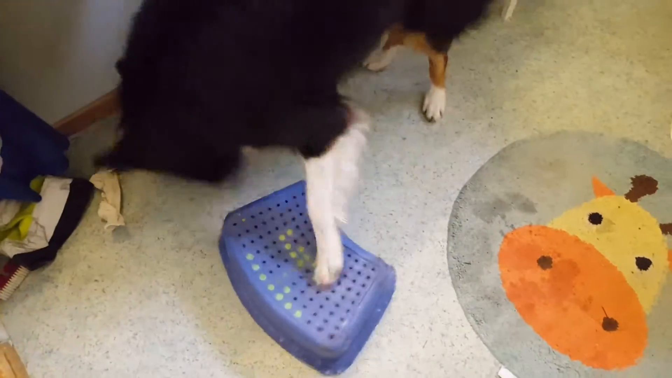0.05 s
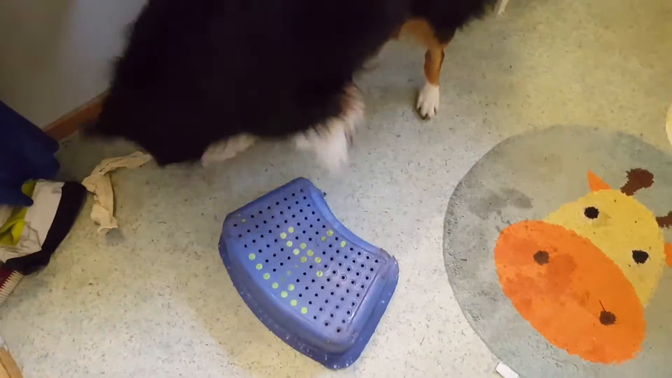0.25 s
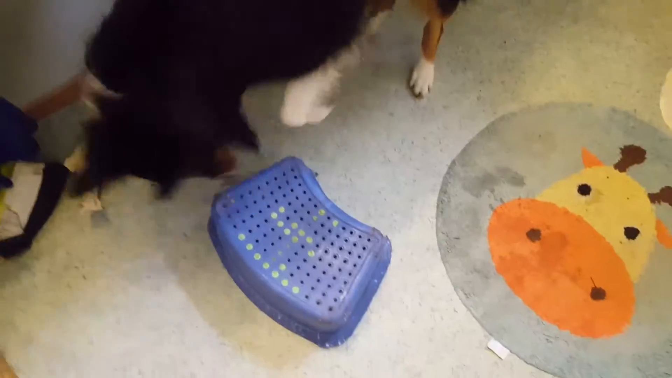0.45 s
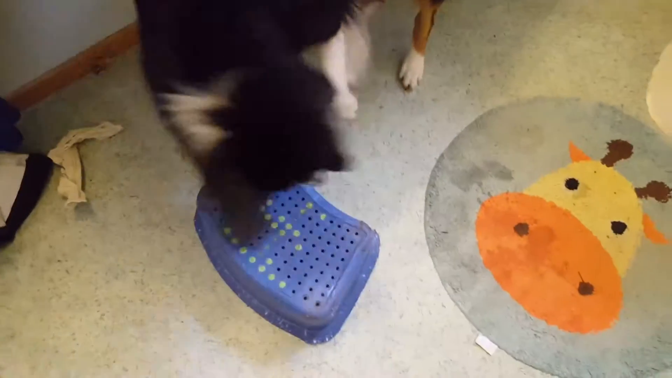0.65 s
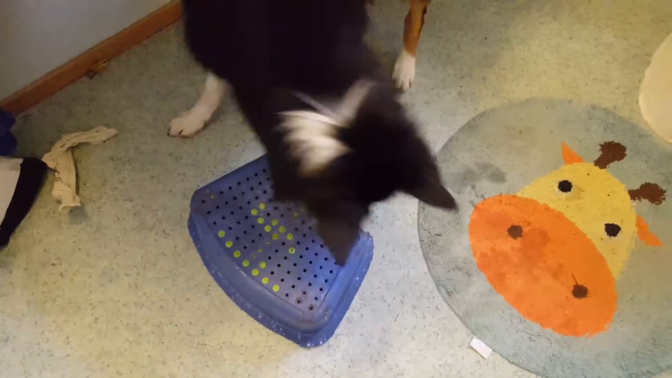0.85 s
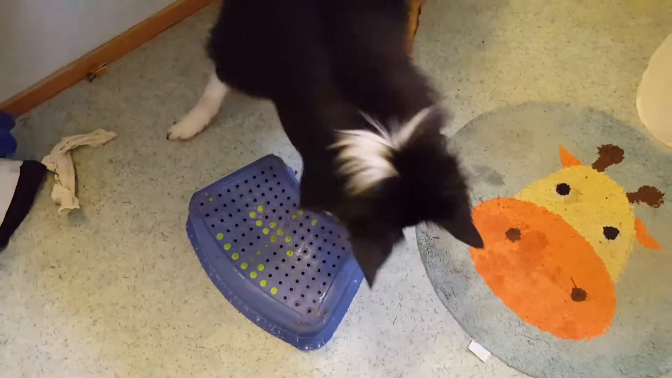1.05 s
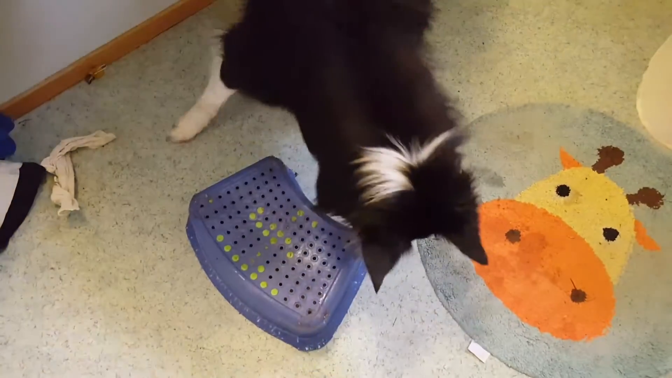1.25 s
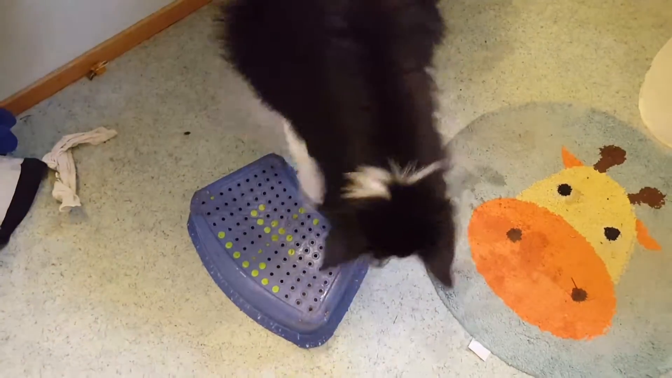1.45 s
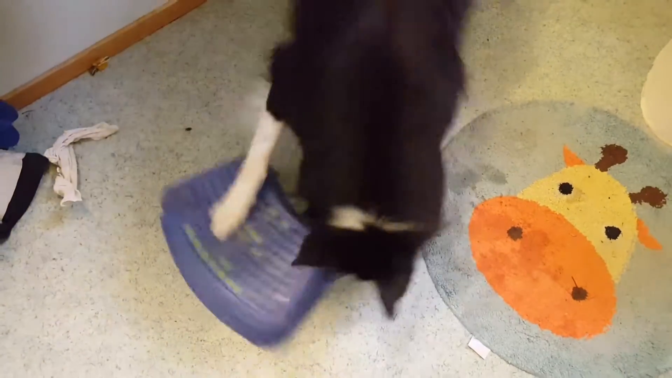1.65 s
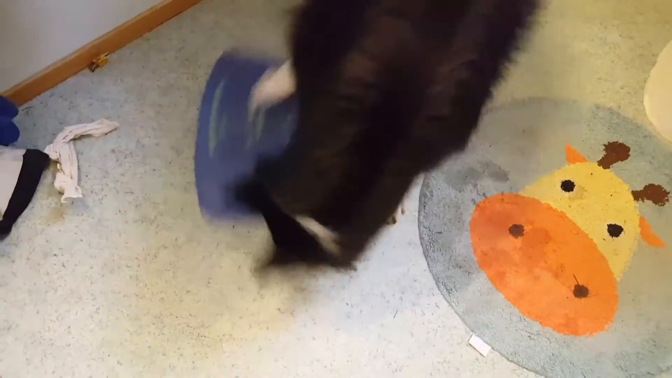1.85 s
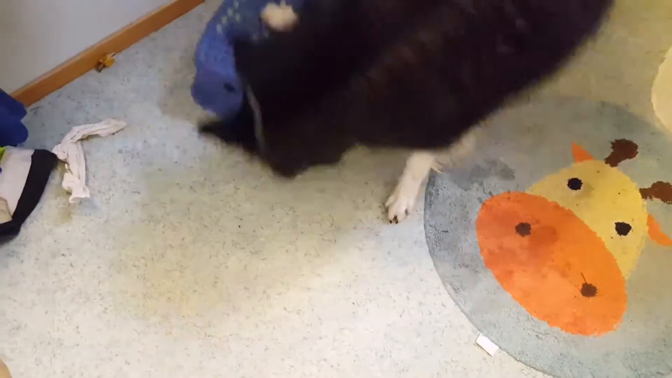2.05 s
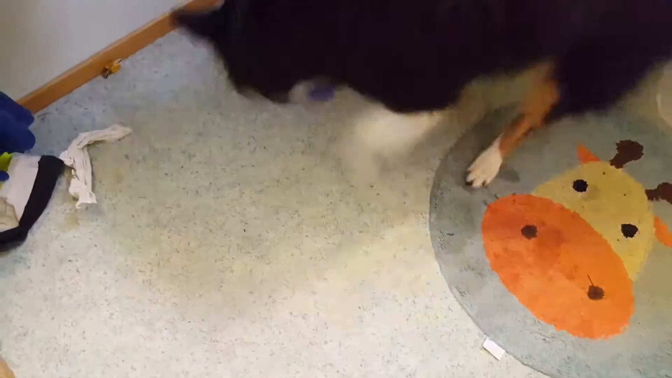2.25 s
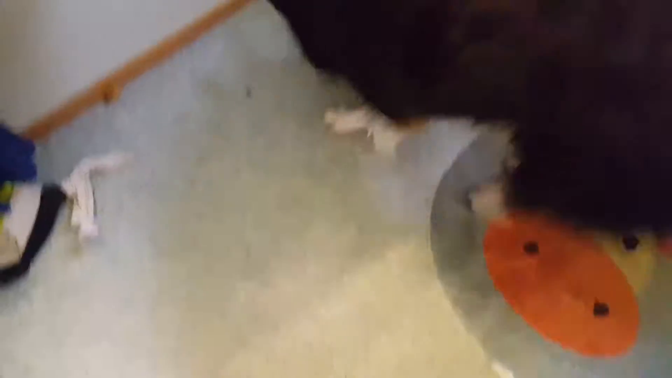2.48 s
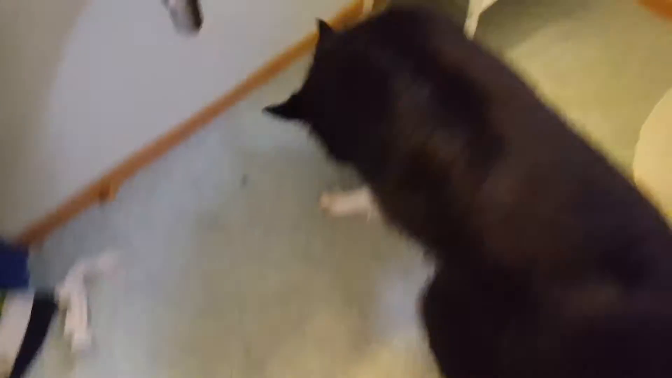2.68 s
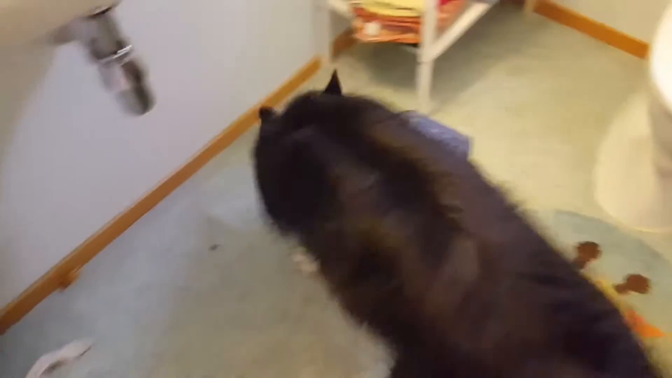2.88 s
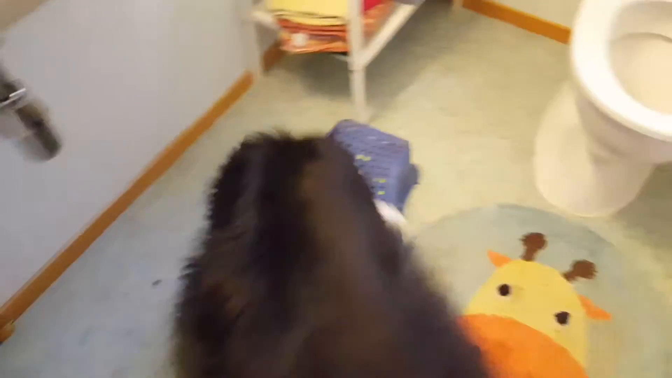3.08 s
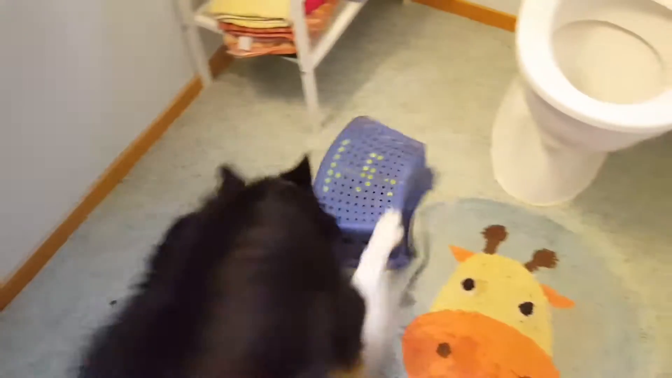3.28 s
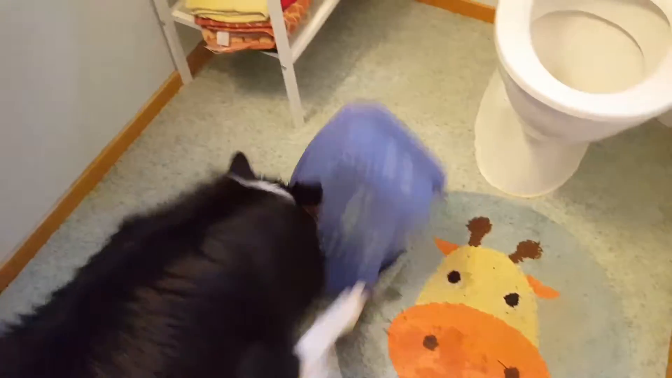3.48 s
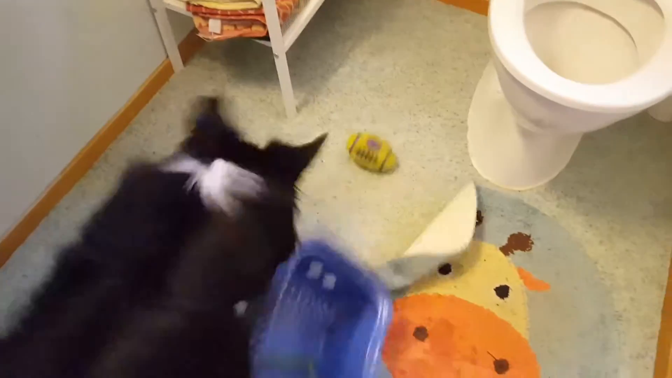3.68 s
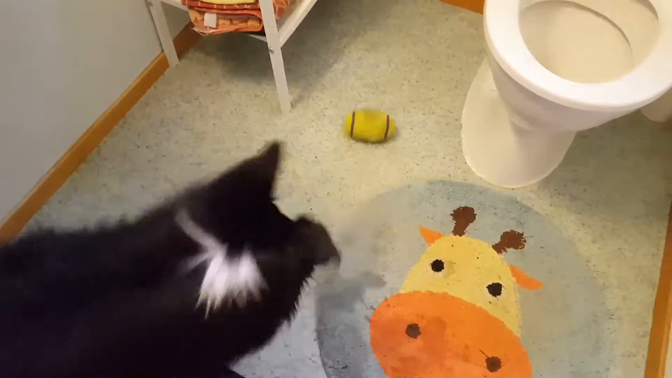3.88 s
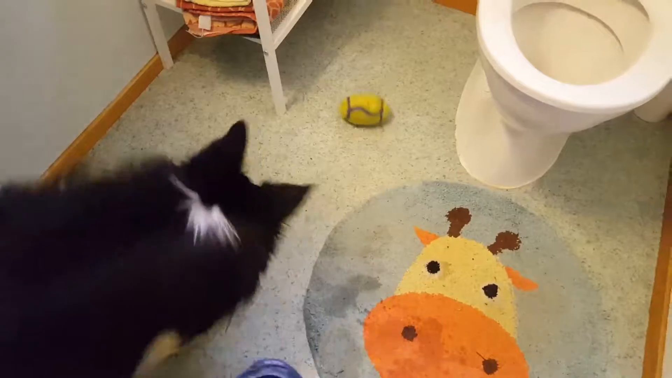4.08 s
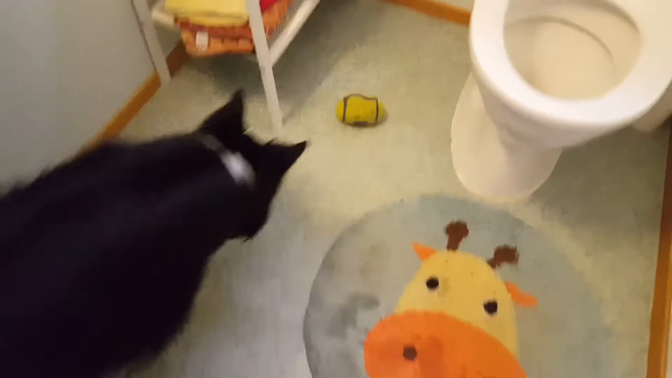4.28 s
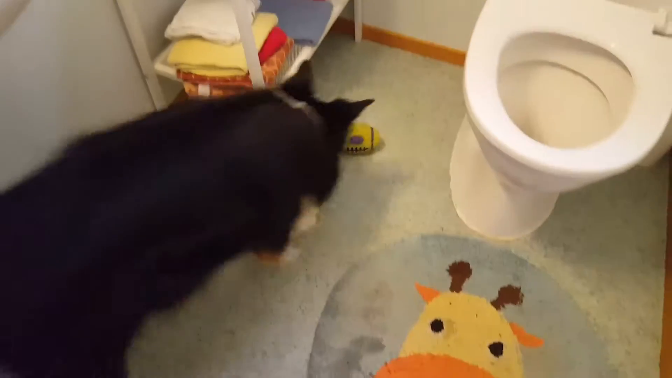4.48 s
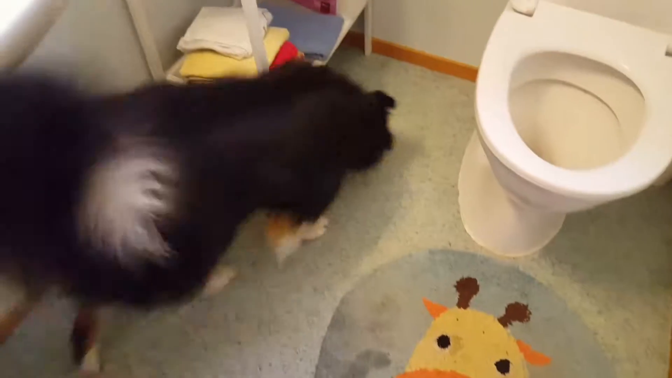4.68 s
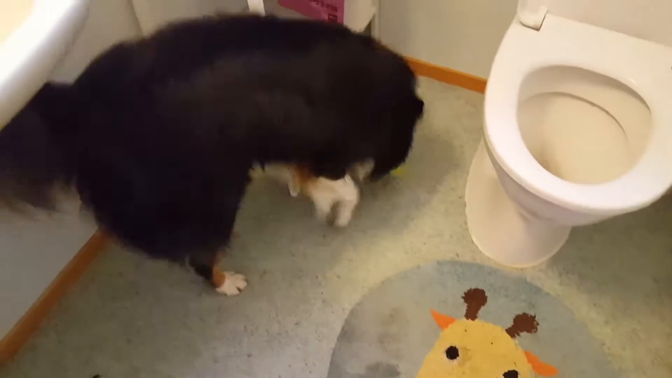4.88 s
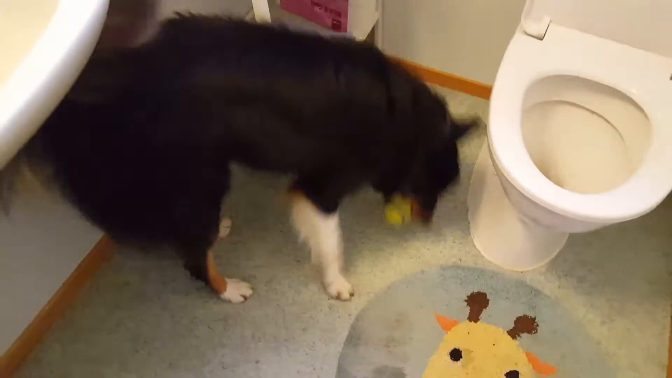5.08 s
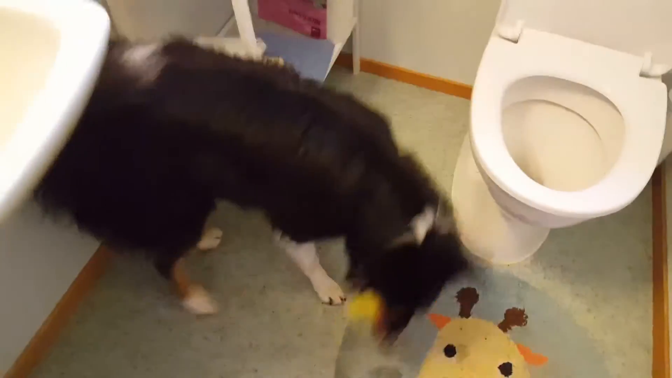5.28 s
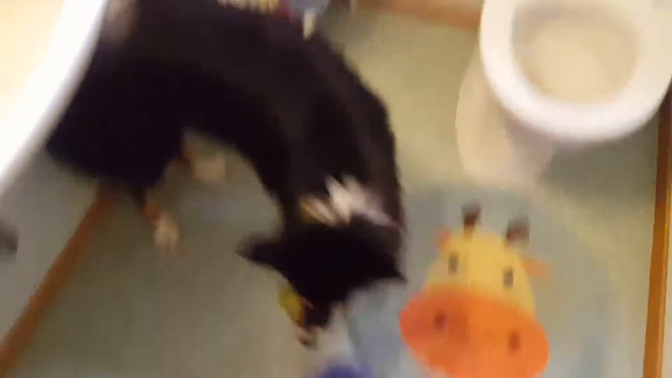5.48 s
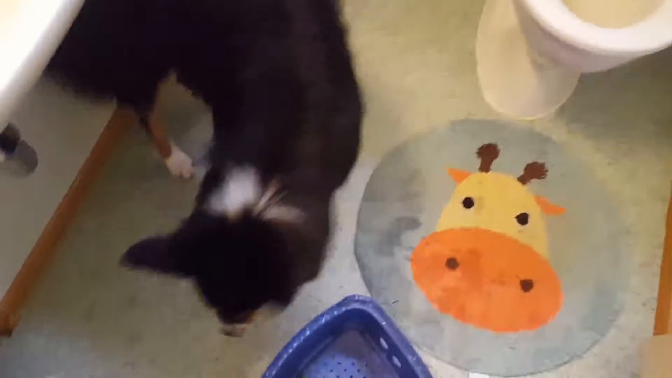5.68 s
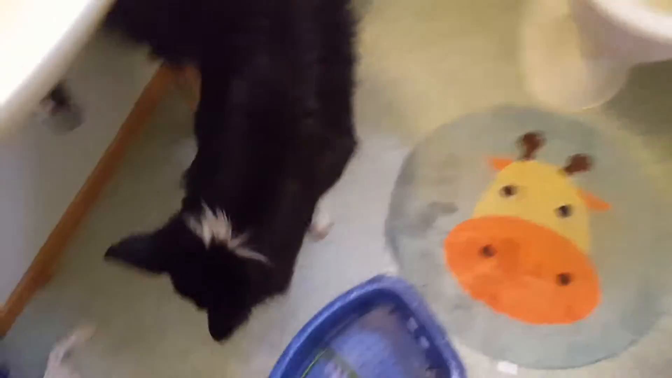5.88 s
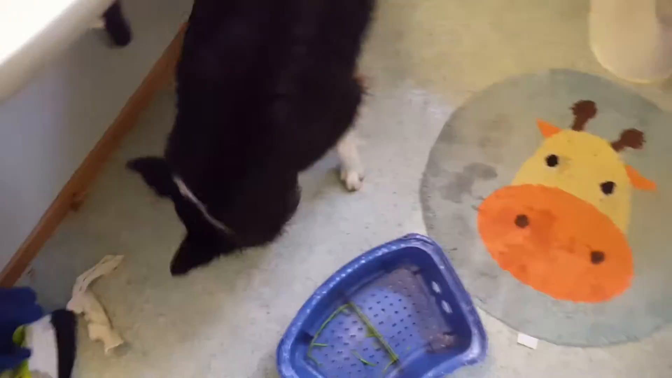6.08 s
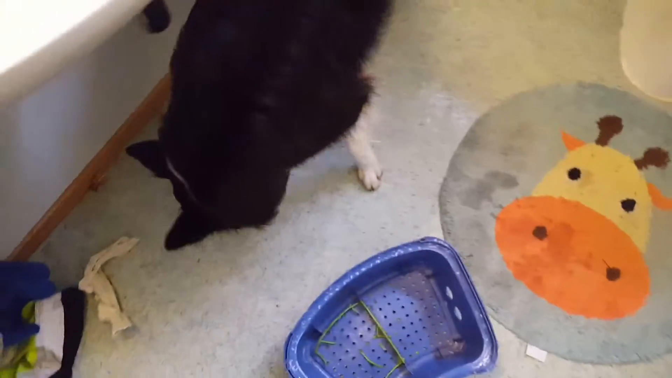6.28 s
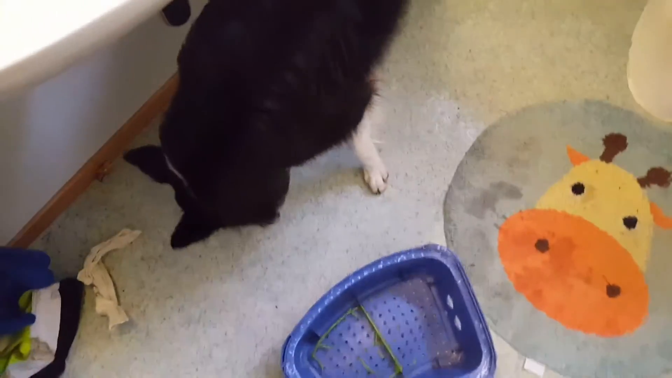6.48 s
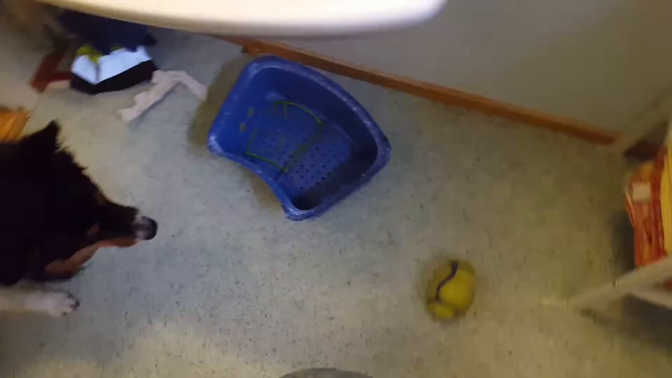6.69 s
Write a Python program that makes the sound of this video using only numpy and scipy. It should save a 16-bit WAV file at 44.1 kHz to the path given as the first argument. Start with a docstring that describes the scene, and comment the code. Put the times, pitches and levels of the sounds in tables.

```python
"""Dog and plastic stool in a bathroom

A dog shoves a hollow plastic step stool over a hard floor in a small, booming stereo room with quiet air.
Uneven slips drive the sliding feet and rim; nearly even stick-slip makes them groan or squeak.
Blows ring the shell and the walls as the stool flips and tumbles to rest; some sound one clear mode.
Tiny scuffs make a brushing rustle, of the sliding stool at first and then of the dog,
whose paws and claws touch the floor as softer blows."""
import sys
import numpy as np
from scipy import signal
from scipy.fft import rfft, irfft, next_fast_len
from scipy.io import wavfile

SR = 44100
rng = np.random.default_rng(int(sys.argv[2]) if len(sys.argv) > 2 else 0)


def inscribe(sig):
    """Save sig as 16-bit PCM at rate SR to the path in sys.argv[1].

    A 1-D sig is mono; a 2-D sig holds one channel per row.
    Samples are clipped to [-1, 1] before scaling.
    """
    pcm = np.round(np.clip(np.atleast_2d(sig).T, -1, 1) * 32767)
    wavfile.write(sys.argv[1], SR, pcm.astype(np.int16))


N = 297220
SIZE = 24576  # samples in one ring-out
T = np.arange(SIZE) / SR
HZ = np.fft.rfftfreq(SIZE, 1 / SR)


def amp(db):
    """Decibels to gain."""
    return 10 ** (np.asarray(db) / 20)


def unit(x):
    """x at rms 1."""
    return x / np.sqrt(np.mean(x ** 2) + 1e-20)


def along(points, hz):
    """Read (frequency [Hz], value) points on a log frequency axis."""
    f, v = np.transpose(points)
    return np.interp(np.log(hz + 1), np.log(f + 1), v)


def add(out, s, x):
    """Mix x into out from time s [s]."""
    part = out[:, max(round(s * SR), 0):][:, :x.shape[1]]
    part += x[:, :part.shape[1]]


def coloured(x, gain):
    """Pass a ring-out through the causal minimum-phase filter of that gain, by way of the cepstrum."""
    fold = np.r_[1, np.full(SIZE // 2 - 1, 2), 1, np.zeros(SIZE // 2 - 1)]
    cepstrum = irfft(np.log(np.maximum(gain, 1e-6))) * fold
    return irfft(rfft(x) * np.exp(rfft(cepstrum)))


# likeness of the two microphones: (frequency [Hz], left-right correlation [-])
LIKENESS = [(60, 1), (140, 0.93), (260, 0.86), (500, 0.72), (1000, 0), (12000, 0.046)]


def diffuse(size, spectrum=None):
    """Stereo noise from all sides: the bass is alike at both microphones, the treble is not."""
    hz = np.fft.rfftfreq(size, 1 / SR)
    turn = np.arccos(np.clip(along(LIKENESS, hz), 0, .995)) / 2
    gain = 1 if spectrum is None else amp(along(spectrum, hz))
    noise = rfft(rng.standard_normal((2, size)))
    mid, side = irfft(noise * gain * [np.cos(turn), np.sin(turn)], size)
    return unit(np.array([mid + side, mid - side]))


# shell and room modes that ring together: (frequency [Hz], relative energy [dB], t60 [s])
RINGING_MODES = [(89, -24, 0.19), (143.1, -23.5, 0.35), (233.9, -23, 0.23), (311.6, -35.5, 0.25),
                 (357.5, -27, 0.33), (487, -25.5, 0.49), (669, -29, 0.08), (766.7, -27, 0.25),
                 (1196, -32.5, .18), (1464, -27.5, 0.1), (1894, -29, 0.1), (2145, -28, 0.13),
                 (3030, -33, .08)]
# decay of the bathroom: (frequency [Hz], t60 [s])
ROOM_DECAY = [(80, 0.3), (250, 0.34), (700, 0.29), (2000, 0.27), (6000, 0.25), (14000, 0.28)]


def ring_out(crack_db, modes_db, crack_t60=0.019, wall_delay=0.0038):
    """The answer to one push at a new spot: a short direct crack, ringing modes and the walls' tail."""
    hz, t, z = signal.stft(diffuse(SIZE), SR, nperseg=256)
    decay = amp(-60 * t / along(ROOM_DECAY, hz)[:, None])
    tail = signal.istft(z * decay, SR, nperseg=256)[1][:, :SIZE]
    tail = tail * (1 - np.exp(-T / wall_delay))  # reflections build up within a few metres
    crack = diffuse(SIZE) * amp(-60 * T / crack_t60)  # plastic is heavily damped
    answer = tail / np.linalg.norm(tail[0]) + amp(crack_db) * crack / np.linalg.norm(crack[0])
    for mode_hz, db, t60 in RINGING_MODES:
        mode = np.cos(2 * np.pi * mode_hz * T) * amp(-60 * T / t60)
        spread_db = rng.normal(0, 4.02)  # each spot excites each mode differently
        answer += amp(modes_db + db + spread_db) * mode / np.linalg.norm(mode)
    return answer


def spot(depth_db, count=56):
    """Every point of contact favours its own set of broad resonances."""
    pitches = np.geomspace(300, 15000, num=count)
    strengths = depth_db * rng.standard_normal(size=count) * (pitches > pitches[0])
    return amp(along(np.c_[pitches, strengths], HZ))


def slips(t, rate, spread, clump_db):
    """Tiny catches and releases of uneven strength, rate a second on average, that come in clumps."""
    count = len(t)
    passed = np.floor(np.cumsum(rng.exponential(size=count) * rate / SR))
    catches = np.diff(passed, prepend=0)
    knots = np.linspace(t[0], t[-1], num=12)
    clumps = amp(clump_db * np.interp(t, knots, rng.standard_normal(len(knots))))
    sizes = rng.choice([-1, 1], count) * np.exp(spread * rng.standard_normal(count))
    shift = rng.uniform(-.5, .5, count) * SR / rate  # up to half a mean gap either way
    scatter = np.clip(np.arange(count) + shift, 0, count - 1).astype(int)
    return unit(np.bincount(scatter, catches * sizes, count) * clumps)


# edges of the zones thump, body, knock, clack and tick: (frequency [Hz])
ZONE_EDGES = [60, 200, 700, 2000, 6000, 15000]


def zone_levels(x, window):
    """Level of each zone [dB] over the first window seconds, both microphones averaged."""
    start = x.mean(0)[:round(window * SR)]
    power = 2 * np.abs(rfft(start, SIZE)) ** 2 / (SIZE * len(start))
    return 10 * np.log10(np.histogram(HZ, ZONE_EDGES, weights=power)[0] + 1e-20)


def blows(rows, spectrum, balance_db, crack_db, modes_db, spot_db, window, cutoff_hz, contact_s):
    """A harder contact tilts the ring towards the treble; the weight behind it sets the floor's thump."""
    out = np.zeros((2, N))
    centres = np.sqrt(np.multiply(ZONE_EDGES[1:], ZONE_EDGES[:-1]))
    octaves = np.log2(centres / centres[1])  # above the body zone
    radiated = 1 / np.sqrt(1 + (cutoff_hz / (HZ + 1)) ** 4)  # small things radiate little deep bass
    landing = 1 - np.exp(-T / contact_s)  # the contact takes a moment to close
    for s, db, hardness, thump_db in rows:
        levels = db + np.array(balance_db) + np.where(octaves < 0, thump_db, hardness * octaves)
        colour = radiated * amp(along(spectrum, HZ)) * spot(spot_db)
        hit = coloured(landing * ring_out(crack_db, modes_db), colour)
        for _ in range(2):  # bring each zone close to its level in two passes
            correction_db = levels - zone_levels(hit, window)
            hit = coloured(hit, amp(along(np.c_[centres, correction_db], HZ)))
        add(out, s, hit)
    return out


# colour of the quiet room's air: (frequency [Hz], relative density [dB per Hz])
AIR_COLOUR = [(25, -9), (45, -6), (70, -12.5), (97, -3), (125, -16.5), (300, -14.5), (430, -18.5),
              (540, -15), (700, -21.5), (1400, -21), (4000, -32.5), (16000, -40)]


def background(air_db=-62):
    """Still room air: steady coloured noise that reaches the microphones from all sides."""
    return amp(air_db) * diffuse(N, AIR_COLOUR)


# brushing rustle, of the sliding stool at first and then of the dog:
# (time [s], length [s], level [dB])
BRUSHES = [(2.68, 0.31, -34), (3.043, 0.86, -41), (4.1, 0.25, -52), (4.505, 0.57, -57.5),
           (4.868, 0.95, -53), (5.601, 0.73, -61.5), (6.506, 0.43, -69.5)]
# colour of the rustle: (frequency [Hz], relative density [dB per Hz])
RUSTLE_COLOUR = [(59, -52), (100, -9), (135, -3.5), (389, -9.5), (558, -9), (1130, -10.5), (1800, -14.5),
                 (4500, -22.5), (7500, -30.5), (12400, -27), (16000, -43.5)]


def rustle(swell=0.77):
    """Brushing contact makes tiny uneven scuffs that swell and fade with each row's movement."""
    out, t = np.zeros((2, N)), np.arange(N) / SR
    speed = np.zeros(N)
    for s, length, db in BRUSHES:
        progress = np.clip((t - s) / length, 0, 1)
        speed += amp(db) * np.abs(np.sin(np.pi * progress)) ** swell
    force = speed * slips(t, rate=380, spread=0.88, clump_db=8.5)
    answer = coloured(ring_out(crack_db=-8.5, modes_db=-2.0), amp(along(RUSTLE_COLOUR, HZ)))
    add(out, 0, signal.fftconvolve(force[None], answer / np.linalg.norm(answer[0]), axes=1))
    return out


# the dog's paws and claws touch the floor:
# (time [s], strength [dB], contact hardness [dB per octave], floor thump [dB])
PAW_FALLS = [(0.567, -52.5, -2.2, -14), (1.366, -78, -0.5, 21), (1.463, -56.5, -3, -11),
             (1.594, -53, -1.5, 11), (4.544, -52, -2, 10), (4.661, -49, -0.5, 4), (4.792, -48.5, -1.5, -1),
             (4.9, -50.5, -4.5, -30), (5.188, -41, -0.14, 1.5), (5.315, -46, -3, -11.5),
             (5.69, -46.5, -2, 6), (5.754, -53, 1, -16), (5.993, -63.5, 1, 21), (6.204, -67, 1.5, -5),
             (6.611, -58.5, 2, 30.5), (6.674, -66.5, 4.5, 2)]
# colour of a paw on the floor: (frequency [Hz], relative density [dB per Hz])
PAD_COLOUR = [(18, -44.5), (40, -24), (145, 2.5), (437, -19), (1280, -43), (1390, -42), (2540, -40.5),
              (3060, -44), (4080, -43.5), (7090, -47), (12000, -41), (16000, -57)]
# an average footfall, one row a zone from thump to tick: (relative level [dB])
PAW_ZONES = [-3.5, -2.5, -5.5, -6.5, -13.5]


def paws():
    """Soft pads close slowly on the floor and claws tick: blows with weak modes."""
    return blows(PAW_FALLS, PAD_COLOUR, PAW_ZONES, crack_db=-4.5, modes_db=-8, spot_db=3.5,
                 window=0.027, cutoff_hz=48, contact_s=0.0016)


# contacts that sound one clear mode of a stool panel, the toy ball or the floor:
# (time [s], frequency [Hz], level [dB])
CLEAR_TAPS = [(0.848, 1996, -44.5), (1.462, 1160, -50), (2.838, 2147, -26.5), (2.975, 2983, -35),
              (3.61, 353, -15.5), (3.798, 1083, -21), (4.075, 1715, -28), (4.671, 137, -29),
              (4.901, 588, -48), (5.696, 139, -38.5), (6.002, 294, -48.5), (6.614, 284, -42)]


def taps(window=.03, t60_at_1khz=.055, damping=.45):
    """One damped mode rings into the room; low ones last longer, by a power of pitch."""
    out = np.zeros((2, N))
    for s, hz, db in CLEAR_TAPS:
        t60 = t60_at_1khz * (hz / 1000) ** -damping
        mode = np.sin(2 * np.pi * hz * T) * amp(-60 * T / t60)
        sound = signal.fftconvolve(mode[None], ring_out(crack_db=7.5, modes_db=-12), axes=1)
        add(out, s, amp(db) * sound / sound[:, :round(window * SR)].std())
    return out


# a foot locks into regular stick-slip: (time [s], length [s], mean slip rate [1/s], level [dB])
FOOT_GROANS = [(0.0, 0.13, 1650, -39.5), (1.655, 0.045, 390, -22), (2.44, 0.098, 150.6, -13.5),
               (3.318, 0.035, 384, -10), (3.346, 0.063, 1950, -21), (3.385, 0.08, 490, -21)]


def groans(jitter=.065, overtone_db=-13, soft_hz=3000):
    """A foot sticks and slips at a nearly even rate for a moment; soft plastic rounds off each slip."""
    out = np.zeros((2, N))
    for s, length, slip_hz, db in FOOT_GROANS:
        knots = np.linspace(0, T[-1], num=160)
        waver = np.interp(T, knots, rng.standard_normal(size=160))
        phase = 2 * np.pi * np.cumsum(slip_hz * (1 + jitter * waver)) / SR
        grip = np.sqrt(np.abs(np.sin(np.pi * np.minimum(T / length, 1))))
        tone = np.zeros(SIZE)
        for k in range(1, 5):  # harmonics
            rounding = np.exp(-k * slip_hz / soft_hz)
            tone += amp(overtone_db * np.log2(k)) * rounding * np.sin(k * phase)
        force = grip * tone
        sound = signal.fftconvolve(force[None], ring_out(crack_db=9, modes_db=-5.0), axes=1)
        add(out, s, amp(db) * sound / sound[:, :round(length * SR)].std())
    return out


# each shove sets the stool sliding; gripping feet add judder, a dragging rim adds rasp:
# (time [s], length [s], slide drive [dB], grip over slide [dB], rim over slide [dB])
STOOL_SHOVES = [(0.0, 0.13, -32.5, 6, 0.5), (0.19, 0.037, -43.5, 14.5, 11.5), (1.607, 1.05, -32.5, 10.5, 4),
                (1.837, .11, -45, 32.5, 13.5), (2.281, 0.071, -29, 19, 13), (2.476, 0.14, -32, 15, 1),
                (2.602, 0.073, -41, 29, 17.5), (2.695, 0.26, -42.5, 8, 7.5), (3.182, .1, -45.5, 18.5, 8),
                (3.291, 0.11, -30.5, 12, 14.5)]


def pressures(t, attack_s=0.0079, release_s=.022, sag_db_per_s=1):
    """Drive of judder, rasp and hiss at times t: a shove takes hold, slowly loses force and lets go."""
    power = np.zeros((3, len(t)))
    for s, length, slide_db, grip_db, rim_db in STOOL_SHOVES:
        age = np.maximum(t - s, 0)
        hold = np.minimum(age / attack_s, 1) * amp(-sag_db_per_s * age)
        push = hold * np.exp(-np.maximum(age - length, 0) / release_s)
        drive_db = slide_db + np.array([grip_db, rim_db, 0])
        power += np.outer(amp(drive_db), push) ** 2
    return np.sqrt(power)


# three scales of roughness, judder, rasp and hiss:
# (low edge [Hz], high edge [Hz], mean slip rate [1/s], log size spread [-], relative level [dB])
ROUGH_SCALES = [(100, 650, 260, 0.58, -4.5), (654, 3180, 220, 0.7, -2.5), (3710, 17000, 1500, 0.25, -2)]
# colour of a sliding foot: (frequency [Hz], relative density [dB per Hz])
FRICTION_COLOUR = [(24, -51), (40, -19), (81, -6), (147, -0.5), (276, -7), (444, -4), (663, -24),
                   (942, -22.5), (1020, -26.5), (1150, -24), (1370, -27.5), (1520, -25), (4930, -33.5),
                   (12800, -49), (16000, -55)]
# spans in which sliding is rendered: (from time [s], to time [s])
SLIDING_SPANS = [(0, .33), (1.6, 3.5)]


def scrape(foot_hz=4900, foot_width_hz=900, foot_db=4, spot_db=2.0, clump_db=3.5, step=.08):
    """The legs judder, the rim rasps over grit and the feet hiss; the colour shifts every step seconds."""
    out = np.zeros((2, N))
    foot_peak_db = foot_db / (1 + ((HZ - foot_hz) / foot_width_hz) ** 2)
    shell = amp(along(FRICTION_COLOUR, HZ) + foot_peak_db)
    bands = []
    for low, high, *_ in ROUGH_SCALES:
        bands.append(1 / np.sqrt((1 + (low / (HZ + 1)) ** 10) * (1 + (HZ / high) ** 10)))
    for s in np.concatenate([np.arange(start - step, end, step) for start, end in SLIDING_SPANS]):
        t = np.arange(max(s, 0), s + 2 * step, 1 / SR)
        dwell = np.sin(np.pi * (t - s) / (2 * step))  # neighbouring spots overlap
        room, colour = ring_out(crack_db=-3.5, modes_db=-3.5), shell * spot(spot_db)
        for pressure, band, (_, _, rate, spread, db) in zip(pressures(t), bands, ROUGH_SCALES):
            force = dwell * amp(db) * pressure * slips(t, rate, spread, clump_db)
            answer = coloured(room, band * colour)
            answer = answer / np.linalg.norm(answer.mean(0))
            add(out, t[0], signal.fftconvolve(force[None], answer, axes=1))
    return out


# the stool's blows on floor and wall:
# (time [s], strength [dB], contact hardness [dB per octave], floor thump [dB])
STOOL_KNOCKS = [(0.103, -30, -3.5, 8.5), (0.254, -49.5, 6.5, 14), (0.848, -52, 5.5, -1),
                (1.623, -30, 4.5, -12.5), (1.701, -36, 7, 9), (1.84, -20.5, -0.6, 6),
                (1.908, -18.5, -1.5, 3), (2.087, -33, 5.5, -9.5), (2.312, -23, 1.3, -5.5),
                (2.472, -19.5, 0.6, -3.5), (2.544, -27, 3.2, -3), (2.618, -17.5, -1.4, -0.5),
                (2.835, -15.5, 0.28, -1), (2.889, -18, -3.12, -0.5), (2.974, -25.5, 2.7, -11),
                (2.995, -31.5, 3, -1.5), (3.153, -29.5, -3.5, 0.5), (3.28, -21, 3.5, -1.5),
                (3.586, -44, -4, 12), (3.608, -8.5, -6.5, -13), (3.689, -27.5, 0.2, 7),
                (3.797, -10, -4, -6), (3.917, -13, -3, -4.5), (4.077, -17.5, -1.5, -4.5),
                (4.183, -25.5, 1.5, -1.5), (4.231, -40, 3, 3.5), (4.282, -14.5, -1.5, -9),
                (4.356, -22, -2.5, -3)]
# colour of a blow on the hollow shell: (frequency [Hz], relative density [dB per Hz])
PLASTIC_COLOUR = [(24, -62), (40, -28.5), (81, 0.5), (130, 3), (276, -0.5), (354, 0), (529, -9), (700, -10),
                  (942, -15.5), (1020, -19.5), (3140, -33), (12100, -56), (16000, -61)]
# an average blow of the stool, one row a zone from thump to tick: (relative level [dB])
STOOL_ZONES = [0.5, 0.5, -4.5, -12.5, -28]


def knocks():
    """The stool strikes floor and wall: a quick contact cracks the plastic and rings shell and room."""
    return blows(STOOL_KNOCKS, PLASTIC_COLOUR, STOOL_ZONES, crack_db=-3.5, modes_db=-3.5, spot_db=4.0,
                 window=0.018, cutoff_hz=85, contact_s=0.00062)


def scene():
    """Room, dog and stool, from the background to the main source."""
    stool = groans() + scrape() + knocks()
    return background() + rustle() + paws() + taps() + stool


def record(dry, top_hz=16100):
    """The phone rounds off the highest peaks and keeps nothing above its band limit."""
    held = dry / (1 + np.abs(dry) ** 8) ** (1 / 8)
    size = next_fast_len(N + SIZE)
    passed = np.fft.rfftfreq(size, 1 / SR) < top_hz
    return irfft(rfft(held, size) * passed, size)[:, :N]


dry = scene()
out = record(dry)
inscribe(out)
```